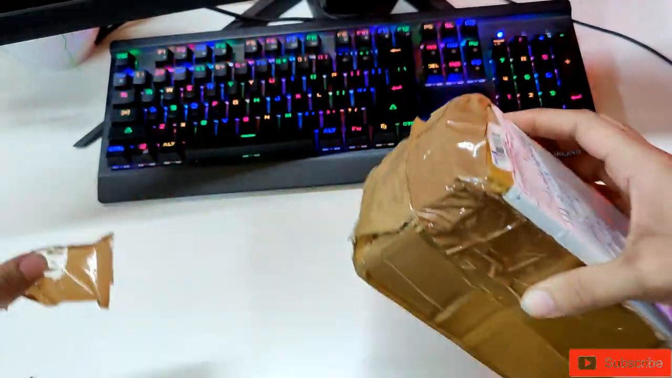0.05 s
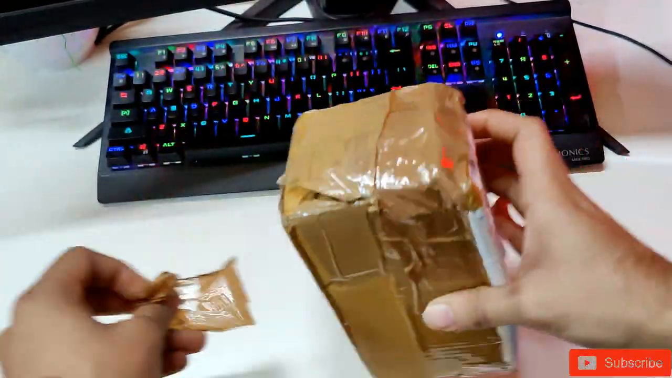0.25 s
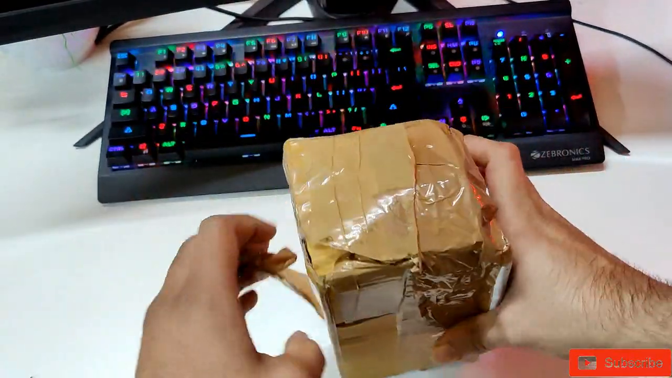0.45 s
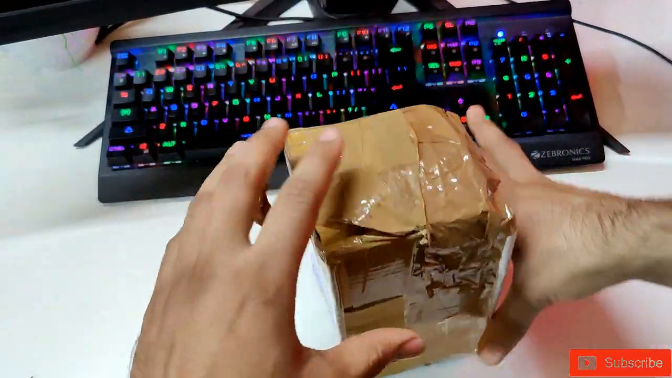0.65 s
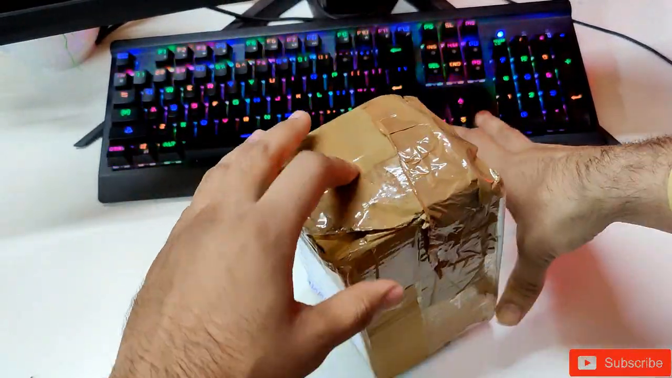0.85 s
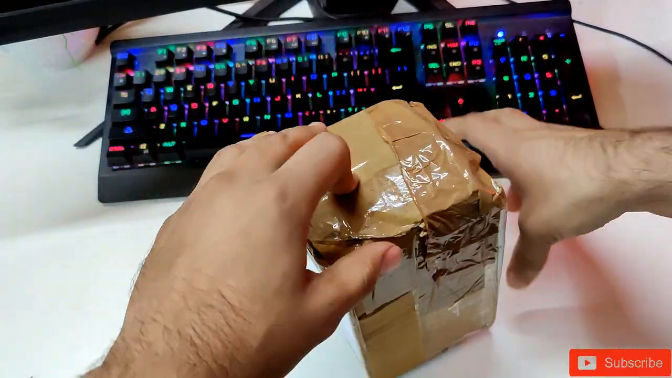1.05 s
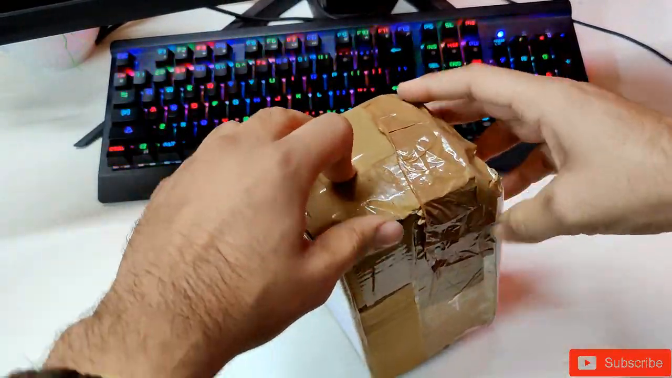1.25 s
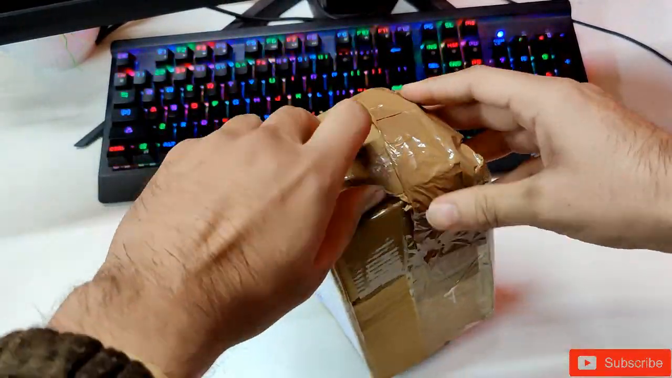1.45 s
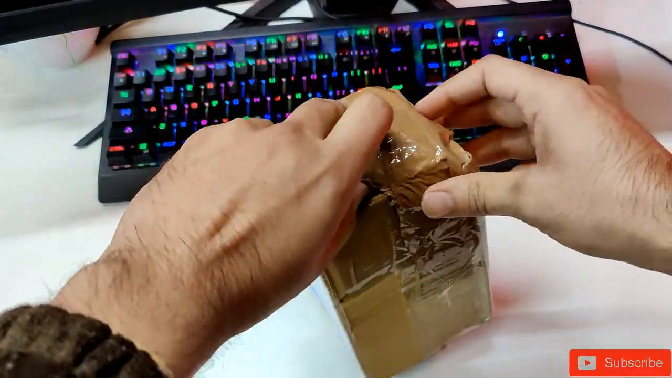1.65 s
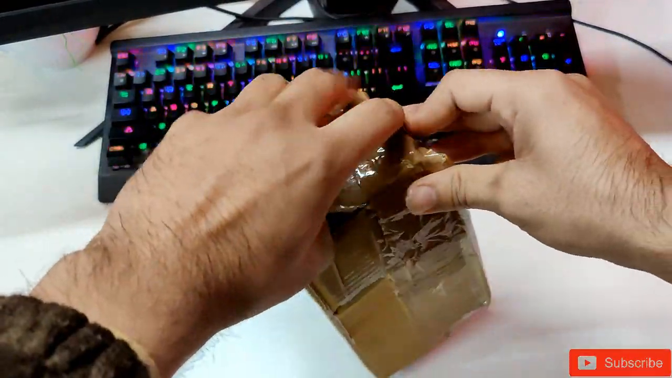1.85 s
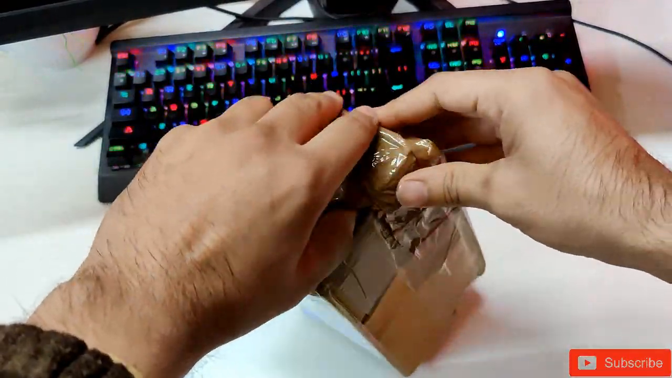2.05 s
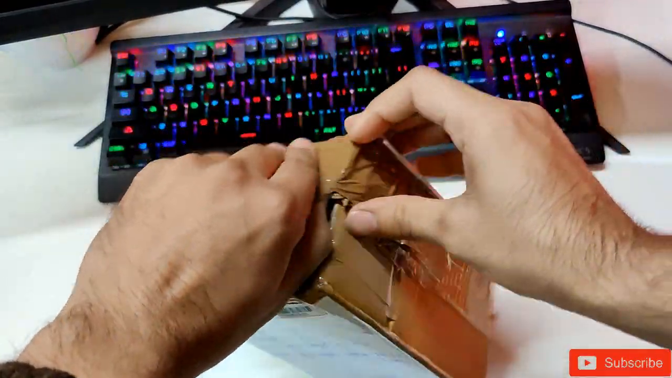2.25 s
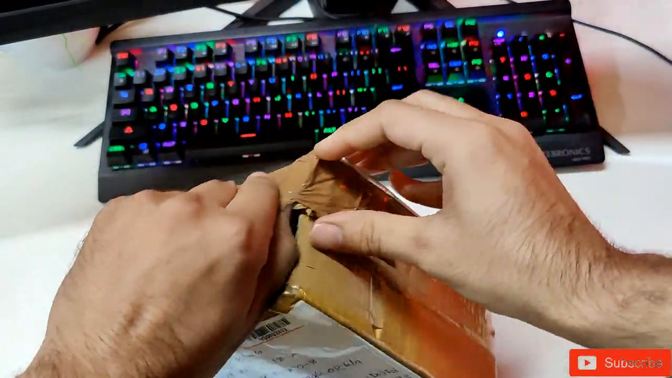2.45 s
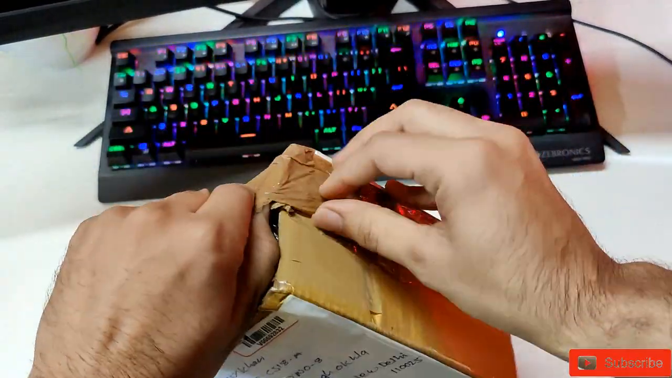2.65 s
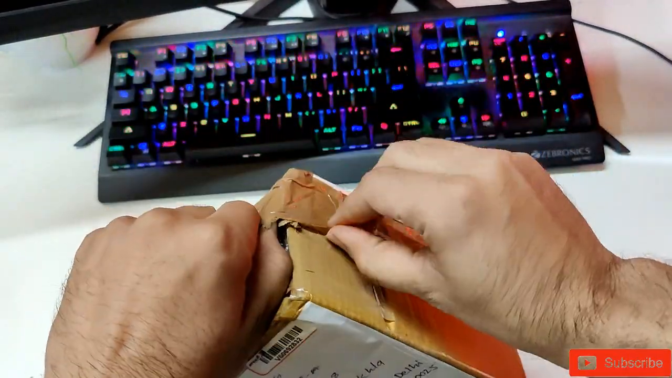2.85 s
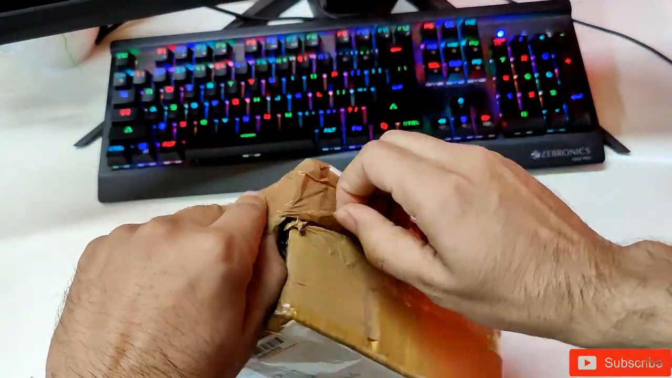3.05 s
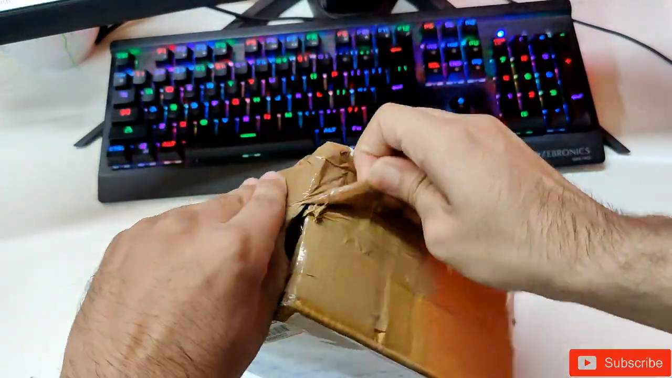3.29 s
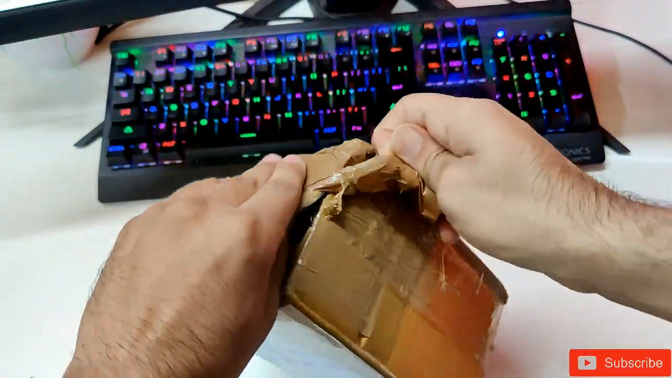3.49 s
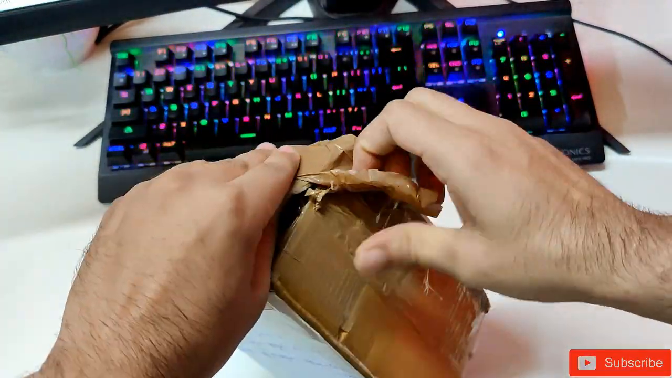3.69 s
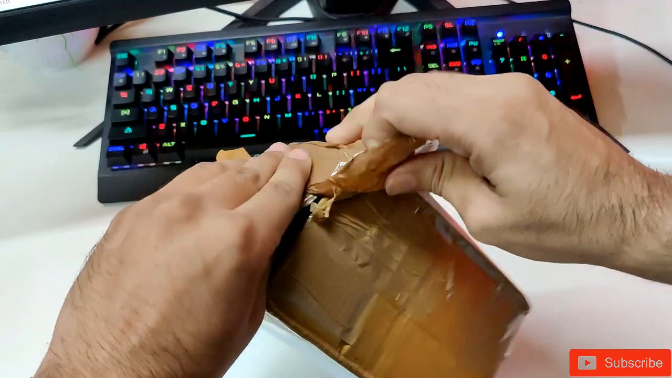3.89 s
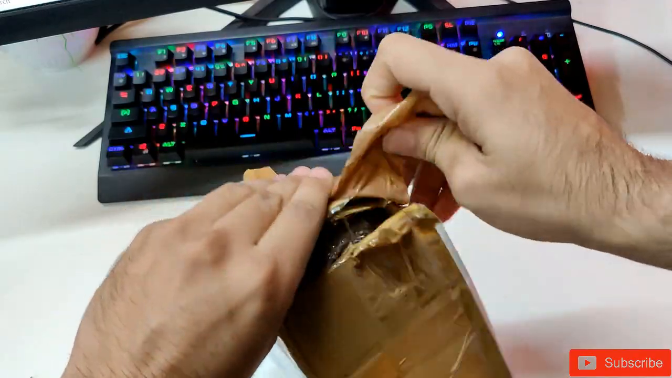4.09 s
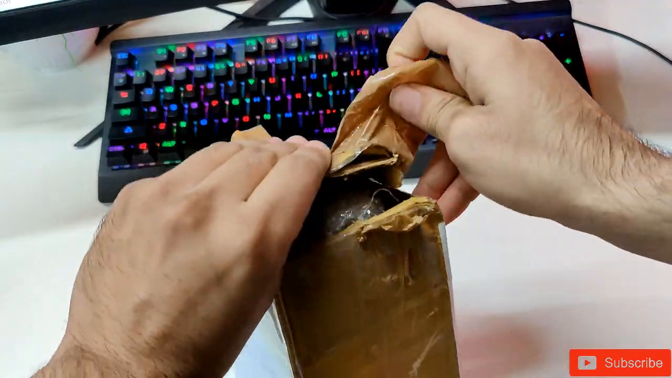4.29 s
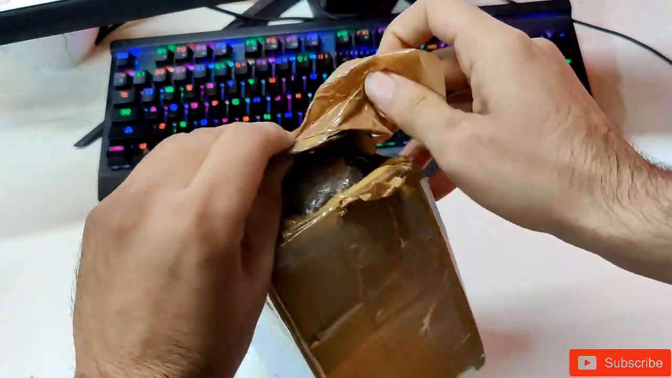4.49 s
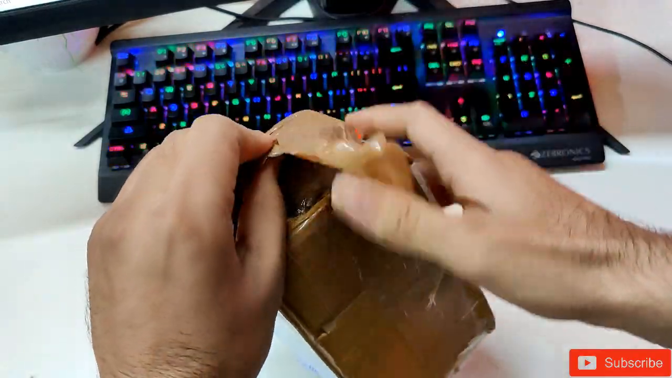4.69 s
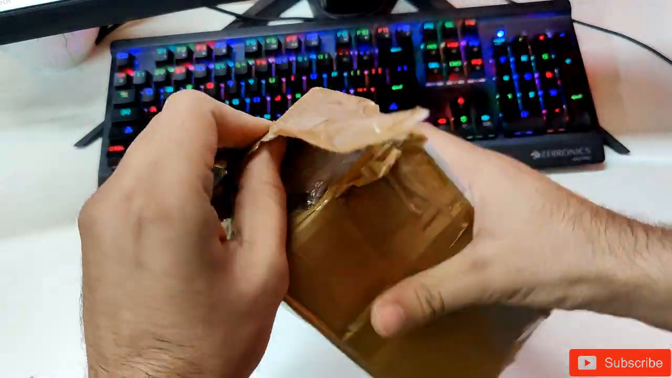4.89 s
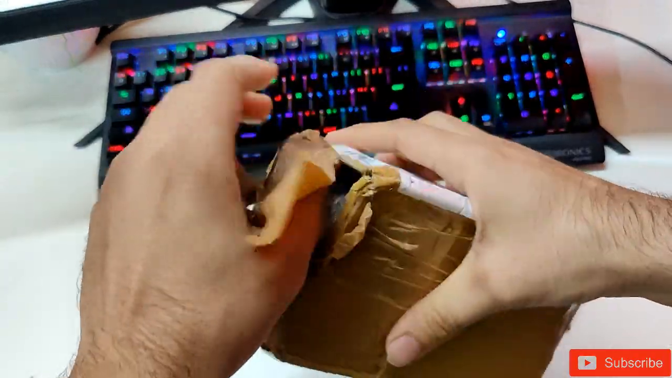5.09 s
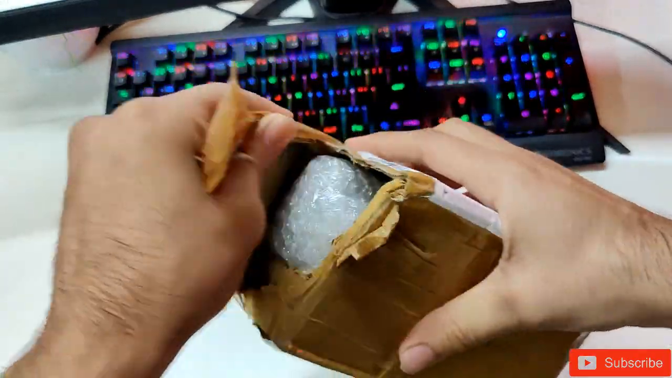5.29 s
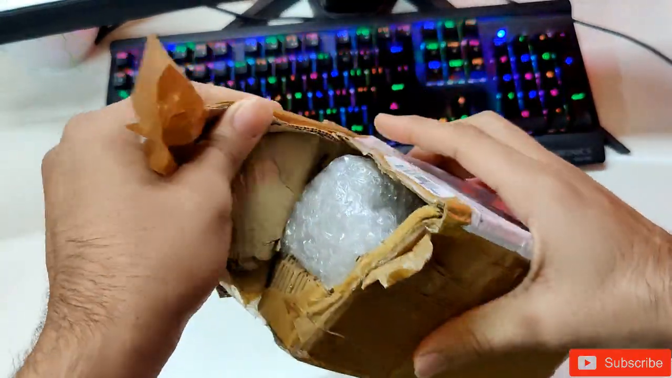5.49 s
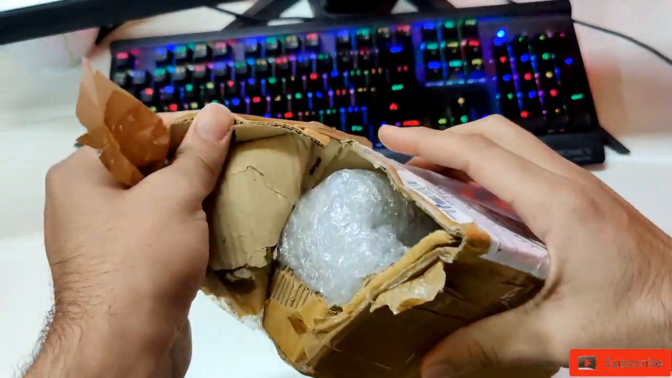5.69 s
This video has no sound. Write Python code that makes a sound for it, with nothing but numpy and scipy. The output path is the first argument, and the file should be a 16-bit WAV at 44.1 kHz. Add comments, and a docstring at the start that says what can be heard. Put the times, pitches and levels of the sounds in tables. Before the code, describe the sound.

Close, crisp stereo sound of hands tearing packing tape from a small hollow carton on a desk in a small room, over very faint low air noise. From 0 to 0.5 s the parcel is turned: light bright crinkles, a few sharp ticks and a soft hollow bump around 0.4. From 0.6 to 2.9 s it is mostly quiet, with sparse film clicks, faint short finger squeaks near 0.9 and 1.1, and small crackles around 1.8 to 2.2. At 3.0 to 3.15 snaps sharpen, then 3.27 to 3.5 brings the densest, loudest rip, bright film cracks mixed with woody card pops, box booms and a low desk thud. Softer rustle follows; another hard tear comes at 4.03 to 4.25, with a smaller one at 4.8. After lighter crackling from 5.1, strong snaps and hollow knocks hit at 5.3 and 5.6 to 5.7. Short room reflections trail the loud cracks.

```python
"""At a desk in a small room, microphones close in front: hands turn a taped cardboard parcel, then pick
at the tape and rip it off. Glue and creased film let go in short snaps, filtered noise bursts with a ring,
over a finer crackle of random grains. The hollow box booms and the desk thuds in dying low tones,
slipping fingers squeak faintly, the room answers with noise echoes and low air noise lies below."""
import sys
import numpy as np
from scipy import signal
from scipy.fft import rfft, irfft
from scipy.io import wavfile
from scipy.ndimage import uniform_filter1d

SR = 44100
rng = np.random.default_rng(int(sys.argv[2]) if len(sys.argv) > 2 else 0)


def log_audio(samples):
    """Write samples as a 16-bit WAV file to the path given in sys.argv[1]."""
    # one column per channel
    frames = np.atleast_2d(samples).T
    # limit to full scale, then quantise
    limited = np.clip(frames, -1, 1)
    pcm = np.round(limited * 32767).astype(np.int16)
    wavfile.write(sys.argv[1], SR, pcm)


def nominal_scale(level):
    """Amplitude ratio for a level in decibels (scalar or array-like)."""
    x = np.asarray(level, float) / 20
    return 10 ** x


N = 253001


def rms_one(x):
    """Scale to rms 1."""
    return x / np.sqrt(np.mean(x ** 2) + 1e-20)


def at_hz(points, hz):
    """Read a table on a log-frequency axis."""
    table_hz, value = np.transpose(points)
    return np.interp(np.log(hz), np.log(table_hz), value)


def band(x, low_hz, high_hz):
    """Butterworth band-pass."""
    sos = signal.butter(2, [low_hz, min(high_hz, .45 * SR)], "band", fs=SR, output="sos")
    return signal.sosfilt(sos, x + 1e-18)


def resonance(x, hz, width_hz):
    """Two-pole resonance with gain of about 1 on top."""
    r = np.exp(-np.pi * width_hz / SR)
    return signal.lfilter([(1 - r * r) / 2, 0, (r * r - 1) / 2], [1, -2 * r * np.cos(2 * np.pi * hz / SR), r * r], x)


def drift(corner_hz):
    """Slow chance with spread 1: noise through two equal low-pass poles, drawn every 40 samples."""
    r = np.exp(-2 * np.pi * corner_hz * 40 / SR)
    noise = rng.standard_normal(N // 40 + 2002)
    slow = signal.lfilter([1], [1, -2 * r, r * r], noise)[2000:]   # skip the settling
    return np.interp(np.arange(N) / 40, np.arange(len(slow)), rms_one(slow))


def stereo(mid, side, alike):
    """Left and right of a given likeness from two independent noises."""
    mid, side = np.sqrt(1 + alike) * mid, np.sqrt(1 - alike) * side
    return np.stack([mid + side, mid - side]) / np.sqrt(2)


def pair(alike):
    """Left and right white noise of a given likeness."""
    mid, side = rng.standard_normal((2, N))
    return stereo(mid, side, alike)


# the loud snaps of tape and card, levels before pan and film colour:
# [t/s, card level/dB, film level/dB, ring f/Hz, ring level/dB]
LOUD_SNAPS = [(.188, -55, -47, 9000, -49), (.2122, -45, -36, 9300, -37.5), (.2358, -54, -33, 9400, -37),
              (.244, -47, -31, 5900, -37), (.3122, -62, -31, 10500, -34), (.3292, -40, -27.5, 13030, -41),
              (.3707, -42, -24, 10500, -29), (.3777, -48, -35, 7300, -27), (.4095, -42, -31, 840, -30),
              (.44, -40, -36, 13420, -34), (.4556, -29.5, -28, 13390, -32), (.5589, -61, -37.5, 7300, -48),
              (.587, -63, -42.5, 4700, -46), (.6936, -53, -42, 7580, -38.5), (.9237, -53, -45, 7800, -30.5),
              (.9363, -32.5, -50, 2370, -35), (.9877, -48, -36, 3290, -32), (1.0063, -52, -31, 13570, -42),
              (1.1643, -55, -36, 3700, -38.5), (1.241, -72, -43, 7060, -47),
              (1.3831, -42, -32.5, 10600, -49), (1.506, -55, -44, 9710, -53),
              (1.5718, -62, -41.5, 13370, -53), (1.7394, -46.5, -29, 12700, -50),
              (1.8258, -49, -30, 6900, -35), (1.8443, -35, -23.5, 7060, -31), (1.9462, -35, -36, 1980, -36),
              (1.9512, -42, -27, 13760, -41), (2.0618, -46, -38, 7450, -42),
              (2.1472, -45, -28.5, 4560, -35), (2.1603, -45, -35, 13930, -37),
              (2.2622, -53, -39, 10600, -35), (2.3855, -64, -37.5, 13300, -34),
              (2.5319, -45.5, -42, 6220, -52), (2.5909, -57, -38, 7150, -41),
              (2.6404, -51.5, -52, 10400, -39), (2.7159, -52, -39.5, 3750, -42.5),
              (2.832, -49.5, -42, 10680, -51), (2.9923, -38.5, -33, 14470, -22),
              (2.9986, -46, -23.5, 7360, -33), (3.0011, -31, -17.5, 7350, -22),
              (3.0323, -45, -29, 12900, -20), (3.0698, -42, -22, 7500, -33),
              (3.0809, -24, -22, 2970, -22.5), (3.1049, -31, -15, 7150, -18.5),
              (3.1094, -31, -18.5, 13850, -18), (3.1317, -27, -28, 3680, -21),
              (3.2597, -34, -27, 2460, -34), (3.27, -46, -24, 11670, -31), (3.2813, -30.5, -19, 6560, -24),
              (3.2906, -32, -15, 7460, -25), (3.3009, -19, -20, 1220, -17.5), (3.3065, -12, -11, 6500, -15),
              (3.3137, -18.5, -15, 6630, -18), (3.323, -18, -19, 1260, -17), (3.3412, -37, -24, 6980, -33),
              (3.3597, -34, -15, 6500, -28), (3.3682, -20.5, -19, 3980, -12), (3.383, -23, -23, 2900, -19),
              (3.391, -12, -17, 2260, -10.5), (3.3643, -36, -19, 6650, -30), (3.3948, -19, -17, 2110, -15),
              (3.3974, -18, -21, 2040, -10), (3.4117, -16, -23, 6300, -17), (3.4187, -14, -25, 2160, -19),
              (3.4308, -13, -10.5, 2120, -11), (3.4407, -19, -21, 6140, -19.5),
              (3.4836, -26, -25, 6370, -28), (3.4922, -23.5, -26, 3900, -23), (3.584, -39, -32, 13650, -46),
              (3.6551, -35, -25.5, 8800, -38), (3.782, -50, -48, 13700, -38),
              (3.831, -39.5, -36, 7280, -41), (3.853, -45, -27.5, 3800, -30), (3.8608, -54, -25, 7410, -37),
              (3.8922, -37, -32.5, 7430, -44), (3.955, -36.5, -32, 13220, -37),
              (3.9921, -38, -25, 13090, -31), (4.009, -44, -30, 12200, -27),
              (4.027, -21.5, -13.5, 9710, -24), (4.0346, -16.5, -10.5, 6440, -18),
              (4.0408, -28, -21, 13540, -27), (4.046, -28, -20, 6590, -31), (4.0545, -21, -19, 4800, -19),
              (4.0605, -21.5, -12, 1610, -26), (4.0772, -21, -16, 6500, -17),
              (4.0978, -24.5, -33, 2560, -22.5), (4.1391, -19.5, -31, 1680, -19),
              (4.1501, -27, -19, 13910, -22), (4.1543, -23, -22, 10450, -26),
              (4.1953, -38, -23, 12200, -32), (4.199, -40, -27, 13740, -31),
              (4.2303, -27, -15.5, 915, -19.5), (4.326, -59, -35.5, 10490, -45),
              (4.3829, -46, -38, 1060, -42), (4.4615, -50, -47, 900, -34.5), (4.5303, -63, -38, 9800, -38),
              (4.5981, -37.5, -29, 7440, -29.5), (4.633, -39, -34, 1760, -36),
              (4.6418, -42, -21, 7640, -27.5), (4.7132, -43, -37, 7240, -41),
              (4.7249, -37, -25, 13700, -41), (4.796, -36, -24, 6850, -32), (4.8066, -22.5, -23, 7820, -28),
              (4.8139, -25, -20.5, 13800, -33), (4.9989, -47, -37, 4970, -44),
              (5.1084, -38, -33, 5800, -36), (5.133, -39.5, -29, 5580, -37),
              (5.1448, -39.5, -31, 7500, -29), (5.1534, -41, -25, 9800, -19.5),
              (5.2295, -31.5, -23, 6040, -33), (5.276, -48, -32, 9000, -44),
              (5.3054, -16, -17, 6740, -18.5), (5.3153, -24, -16, 6760, -26),
              (5.3459, -20.5, -15.5, 6300, -23), (5.38, -29, -21.5, 12200, -32),
              (5.4668, -53, -30.5, 13220, -35), (5.504, -33, -29.5, 9300, -28),
              (5.519, -47, -34, 6610, -31), (5.5265, -34, -26.5, 13400, -34),
              (5.5748, -46, -36, 11970, -24.5), (5.617, -14.5, -13.5, 6400, -20.5),
              (5.6388, -25, -29, 6310, -33), (5.669, -30, -28, 5900, -28), (5.6837, -16, -18, 920, -20)]


def tape_snaps(film_db, card_db):
    """The listed loud snaps together with the small random ones."""
    return snaps(np.vstack([LOUD_SNAPS, small_snaps(film_db, card_db)]))


def small_snaps(film_db, card_db):
    """Snap rows at random moments, levels following the crackle around them, ringing at any pitch."""
    per_s, film_over_db, card_over_db, ring_over_db = 36, 4.5, 3, 2
    chance = rng.random((int(per_s * N / SR), 4))
    i = (chance[:, 0] * (N - 1)).astype(int)
    card_level_db = card_db[i] + card_over_db + 10 * (chance[:, 1] - .5)
    film_level_db = film_db[i] + film_over_db + 10 * (chance[:, 2] - .5)
    ring_hz = 4500 * 3 ** chance[:, 3]
    return np.transpose([i / SR, card_level_db, film_level_db, ring_hz, film_db[i] + ring_over_db])


def snaps(rows):
    """A crack of the film, a duller crack of the card with modes struck anew, and one ring of the freed crease."""
    s, card_db, film_db, ring_hz, ring_db = np.transpose(rows)
    chance = rng.standard_normal((len(s), 2 + len(CARD_MODES)))
    # mean and spread of left over right: snaps scatter about a spot a little to the left
    pan_db = 1.3 + 2 * chance[:, 1]
    # some let go at once, some tear a little
    tau_s = .0008 * nominal_scale(2.2 * chance[:, 0])
    click = np.arange(2048) == 0
    film_colour = rfft(band(band(click, 2900, 23200), 2300, 21300))
    mode_spread_db = 4 * chance[:, 2:]
    modes = 0
    for k, (hz, width_hz, db) in enumerate(CARD_MODES):
        strength = (-1) ** k * nominal_scale(db + mode_spread_db[:, k, None])
        modes = modes + strength * rfft(resonance(click, hz, width_hz))
    card_colour = rfft(band(click, 847, 3100)) * (1 + nominal_scale(6.5) * modes)
    ring_colour = np.array([rfft(resonance(click, hz, 120 + .14 * hz)) for hz in ring_hz])

    film = nominal_scale(film_db)[:, None] * bursts(tau_s, 0.56, film_colour)
    board = nominal_scale(card_db)[:, None] * bursts(2.18 * tau_s, 0.77, card_colour)
    ring = nominal_scale(ring_db)[:, None] * bursts(tau_s, 0.92, ring_colour)
    parts = (film + board + ring) * nominal_scale(np.array([pan_db, -pan_db]) / 2)[:, :, None]
    out = np.zeros((2, N + len(click)))
    for k, i in enumerate(np.maximum(s * SR, 0).astype(int)):
        out[:, i:i + len(click)] += parts[:, k]
    return out[:, :N]


def bursts(tau_s, alike, colour):
    """One dying stereo noise burst per snap, coloured by a causal response, loudest moment at rms 1 in the mid."""
    t = np.arange(1024) / SR
    mid, side = rng.standard_normal((2, len(tau_s), len(t)))
    shape = (1 - np.exp(-t / 0.0004)) * np.exp(-t / tau_s[:, None])
    out = irfft(rfft(stereo(mid, side, alike) * shape, 2048) * colour, 2048)
    power = uniform_filter1d(out.mean(axis=0) ** 2, size=40, axis=1).max(axis=1)
    return out / np.sqrt(power)[:, None]


# grips and tugs, each a burst of crackle, levels before flicker and film colour:
# [start t/s, hold t/s, film level/dB, card level/dB, box level/dB]
TUGS = [(0.0, 0.018, -45, -42.5, -41), (0.055, .03, -59, -57, -58), (0.237, 0.026, -40.5, -52.5, -58),
        (.34, 0.065, -39.5, -54, -52), (0.411, 0.062, -42, -48, -50), (0.586, .16, -65, -65.5, -66),
        (0.925, 0.087, -53.5, -54, -66), (1.124, 0.016, -59, -57, -68), (1.288, 0.048, -80, -69, -51),
        (1.397, 0.034, -59, -72, -57), (1.593, 0.16, -53, -61, -57.5), (1.786, 0.1, -46, -48.5, -51),
        (1.942, 0.15, -49.5, -53, -53.5), (2.148, 0.13, -47.5, -52, -52), (2.298, 0.077, -53, -60, -55),
        (2.58, 0.045, -67, -75, -63), (2.767, 0.11, -64, -76.5, -61.5), (3.02, .06, -48, -58, -54),
        (3.095, 0.029, -44, -48, -50), (3.19, 0.046, -53, -56, -50), (3.29, 0.065, -34, -40, -43),
        (3.401, 0.044, -41, -29, -35), (3.46, 0.039, -33, -39, -48), (3.534, 0.028, -46.5, -50.5, -48),
        (3.6, 0.041, -49.5, -53, -55), (3.834, 0.071, -46.5, -51.5, -51), (3.956, 0.033, -52, -56, -51),
        (4.034, 0.038, -27, -36, -34), (4.137, 0.037, -38.5, -39, -40), (4.207, .06, -47.5, -48.5, -47),
        (4.33, 0.051, -56, -56, -63), (4.428, 0.16, -58, -62.5, -57.5), (4.606, 0.046, -49.5, -60, -60),
        (4.69, .03, -62, -55.5, -58), (4.762, 0.035, -46.5, -49, -57), (4.794, 0.032, -37.5, -41.5, -38),
        (4.953, 0.12, -56.5, -60, -54), (5.117, 0.062, -42, -51, -51.5),
        (5.182, 0.085, -48.5, -52.5, -50.5), (5.314, 0.018, -33, -39.5, -33.5),
        (5.358, 0.029, -41, -41, -38.5), (5.443, 0.04, -51, -56, -54), (5.498, .09, -47.5, -54, -57),
        (5.629, .03, -41, -41, -40.5), (5.68, 0.032, -49, -45, -44)]
# hands resting on the parcel between tugs: [film level/dB, card level/dB, box level/dB]
REST = (-71, -73, -65)


def tugs():
    """Levels of film, card and box in dB: each tug rises, holds and falls over the resting level."""
    rise_db_per_s, fall_db_per_s = 547, 330
    t = np.arange(0, N, 16) / SR
    power = nominal_scale(2 * np.array(REST))[:, None]
    for s, hold_s, *peak_db in TUGS:
        loss_db = rise_db_per_s * np.maximum(s - t, 0) + fall_db_per_s * np.maximum(t - s - hold_s, 0)
        power = power + nominal_scale(2 * (np.array(peak_db)[:, None] - loss_db))
    return [np.interp(np.arange(N) / SR, t, 10 * np.log10(p)) for p in power]


def grains(per_s, spread_db, ms):
    """Envelope of clumped tiny releases, each dying over ms, on top of a smooth rub."""
    born = rng.random(N) < per_s * nominal_scale(3.5 * drift(30)) / SR
    sizes = nominal_scale(spread_db * np.minimum(rng.exponential(1, N), 4.5)) * born
    r = np.exp(-1000 / (ms * SR))
    return rms_one(signal.lfilter([1], [1, -r], sizes)) + .4


def crackle(film_db, card_db):
    """The same grains shake film and card; low, middle and high film each flicker on their own."""
    per_s, flicker_db = 700, 1.4
    shared = grains(per_s, spread_db=1.0, ms=0.69)
    noise = shared * pair(0.69)
    film = 0
    for low_hz, high_hz, db in [(2800, 5430, 0.77), (5860, 7770, 3.5), (9000, 14300, 0.32)]:
        part = band(band(noise, low_hz, high_hz), 2540, 24000)
        film = film + part * nominal_scale(db + flicker_db * drift(14.5))
    coarse = grains(per_s, spread_db=4.0, ms=2.5)
    board = card((shared + 2.8 * coarse) * pair(0.74), ring_db=-14)
    return rms_one(film) * nominal_scale(film_db) + rms_one(board) * nominal_scale(card_db + 2.72 * flicker_db * drift(22))


# card panel resonances, levels relative to one another: [f/Hz, width f/Hz, level/dB]
CARD_MODES = [(926, 136, -8), (1272, 62, -8), (1704, 97, -9.5), (2392, 64, -7.5)]


def card(x, ring_db):
    """Broad card band plus the panel resonances, in alternating sign."""
    broad = band(x, 510, 2640)
    modes = 0
    for k, (hz, width_hz, db) in enumerate(CARD_MODES):
        modes = modes + (-1) ** k * nominal_scale(db) * resonance(broad, hz, width_hz)
    return broad + nominal_scale(ring_db) * modes


# colour of the film and the microphone: [f/Hz, width f/Hz, boost level/dB]
SHINE = [(3070, 1900, 0), (6110, 3440, 3), (9840, 300, 3), (13800, 660, 1.5)]


def shine(tape):
    """Broad treble resonances lifted by adding their own output."""
    return tape + sum((nominal_scale(db) - 1) * resonance(tape, hz, width_hz) for hz, width_hz, db in SHINE)


# fingers slipping on the tape squeak faintly: [t/s, length t/s, f/Hz, width f/Hz, level/dB]
SQUEAKS = [(0.915, 0.043, 8000, 500, -45), (0.932, 0.039, 915, 90, -57), (1.09, 0.029, 835, 90, -57),
           (1.127, 0.044, 850, 80, -55), (4.476, 0.1, 2800, 70, -63)]


def squeaks():
    """Friction noise drawn twice through a narrow resonance."""
    out, t = np.zeros(N), np.arange(N) / SR
    for s, length_s, hz, width_hz, db in SQUEAKS:
        once = resonance(rng.standard_normal(N), hz, width_hz)
        tone = rms_one(resonance(once, hz, width_hz))
        rise, fall = (t - s) / .003, (s + length_s - t) / (0.23 * length_s)
        out += nominal_scale(db) * tone * np.sqrt(np.clip(np.minimum(rise, fall), 0, 1))
    return out


def box_rumble(db):
    """Grip and flexing keep the hollow box murmuring."""
    shake = grains(150, spread_db=4.0, ms=4.2) * pair(0.95)
    hollow = band(shake, 167, 615)
    return nominal_scale(db) * rms_one(hollow + 1.8 * resonance(hollow, 394, 40) + 2.25 * resonance(hollow, 297, 88))


# knocks of the hollow box, main tone before its soft start: [t/s, level/dB, f/Hz]
BOOMS = [(.307, -37, 252), (.406, -20, 367), (.459, -30, 320), (.522, -36, 336), (1.283, -34.5, 320),
         (1.945, -27.5, 401), (2.026, -28.5, 460), (2.213, -34, 434), (2.707, -37, 301), (3, -23, 368),
         (3.08, -29, 363), (3.103, -27, 424), (3.131, -28, 349), (3.219, -30, 365), (3.302, -17, 386),
         (3.319, -16, 403), (3.369, -21, 340), (3.389, -18.5, 384), (3.414, -23, 448), (3.434, -24, 214),
         (3.584, -33.5, 290), (3.954, -22.5, 364), (4.03, -20, 460), (4.054, -24, 446), (4.151, -31, 277),
         (4.178, -32.5, 267), (4.23, -20, 416), (4.803, -23.5, 320), (5.186, -28.5, 342),
         (5.304, -22.5, 308), (5.328, -29, 172), (5.618, -23.5, 409), (5.683, -24, 353)]


def box_booms():
    """The struck air and walls of the box ring briefly, the same in both channels."""
    return knocks(BOOMS, cycles=19.6, rise_s=0.00069, second=0.39)


# box bumping the desk, main tone before its soft start and the factor below: [t/s, level/dB, f/Hz]
THUDS = [(.415, -25, 68.5), (3.292, -21.5, 148), (3.403, -33, 63.4), (4.035, -25, 120), (4.206, -38, 63.6),
         (4.8, -32, 151), (5.171, -39, 99.6), (5.307, -21.5, 101), (5.61, -27.5, 109)]


def desk_thuds():
    """The desk top gives slow-starting low tones, a little louder on the left than on the right."""
    return knocks(THUDS, cycles=17.1, rise_s=0.018, second=0.59) * nominal_scale([[.3], [-.3]])


def knocks(rows, cycles, rise_s, second):
    """Dying low tones with a soft start and a second mode; cycles of the main tone until 60 dB down."""
    out, t = np.zeros(N + SR // 2), np.arange(SR // 2) / SR
    for s, db, hz in rows:
        stretch, phase = rng.standard_normal(2)
        second_hz = hz * (1.35 + 0.15 * stretch)
        tone = np.sin(2 * np.pi * hz * t) + second * np.sin(2 * np.pi * second_hz * t + phase)
        i = max(round(s * SR), 0)
        out[i:i + len(t)] += nominal_scale(db - 60 * t * hz / cycles) * (1 - np.exp(-t / rise_s)) * tone
    return out[:N]


def room(x):
    """Dense stereo echoes: a quick near scatter off desk and hands, then a longer wall tail, thin in the bass."""
    near_t60_s, near_db, tail_t60_s, tail_db = 0.035, -8.5, 0.3, -7
    t = np.arange(SR // 2) / SR
    tail = band(pair(0.25)[:, :len(t)], 445, 18100) * nominal_scale(-60 * t / tail_t60_s) * (1 - np.exp(-t / 0.004))
    near = pair(0.63)[:, :len(t)] * nominal_scale(-60 * t / near_t60_s) * (t > .0008)
    response = nominal_scale(tail_db) * rms_one(tail) + nominal_scale(near_db) * rms_one(near)
    return signal.fftconvolve(x[None], response / np.sqrt(len(t)), axes=1)[:, :N]


# spectrum of the air, relative density: [f/Hz, level/dB per Hz]
AIR = [(20, -30), (30, -7), (40, 5.5), (70, 4.5), (110, 4), (200, -10.5), (330, 3), (420, 0.5),
       (620, -21.5), (800, -18.5), (1500, -16.5), (4500, -25.5), (6600, -17.5), (8500, -24), (13500, -26),
       (16000, -41)]
# left-right likeness of the air: [f/Hz, likeness (1 = the same)]
AIR_LIKENESS = [(60, 1), (130, 0.94), (290, 0.82), (640, 0.12), (3000, 0.019), (7000, 0.32), (15000, 1)]


def air():
    """Narrow bands of stereo noise, each with its level, flicker and likeness; -53 dB rms in all."""
    out, edges_hz = 0, 22 * 2 ** np.arange(0, 9.7, .4)
    white = rng.standard_normal((2, 2, N))   # neighbouring bands take turns
    for k, (low_hz, high_hz) in enumerate(zip(edges_hz, edges_hz[1:])):
        mid, side = band(white[k % 2], low_hz, high_hz)
        hz = np.sqrt(low_hz * high_hz)
        gain = nominal_scale(at_hz(AIR, hz) + 3.4 * drift(13.8))
        out = out + gain * stereo(mid, side, at_hz(AIR_LIKENESS, hz))
    return nominal_scale(-53) * rms_one(out)


def scene():
    """Parcel close in front of the microphones, in a small room."""
    film_db, card_db, box_db = tugs()
    tape = shine(tape_snaps(film_db, card_db) + crackle(film_db, card_db)) + squeaks()
    box = box_rumble(box_db) + box_booms()
    wet = room((tape + nominal_scale(0.5) * box).mean(axis=0))
    return tape + box + wet + desk_thuds() + air()


def low_pass(x):
    """Removes everything above the highest recorded frequency."""
    return signal.sosfilt(signal.butter(12, 16960, fs=SR, output="sos"), x)


def record(dry):
    """The converter rounds the highest peaks below a ceiling of 0.88; the top is cut at 17 kHz."""
    rounded = .88 * np.tanh(dry / .88)
    cut = signal.sosfilt(signal.cheby2(10, 60, 17000, fs=SR, output="sos"), rounded)
    return low_pass(cut)


dry = scene()
out = record(dry)
log_audio(out)
```